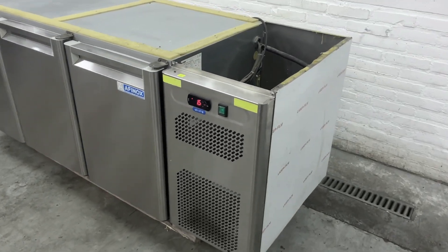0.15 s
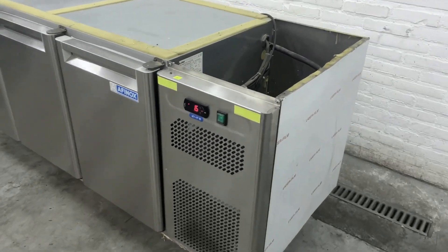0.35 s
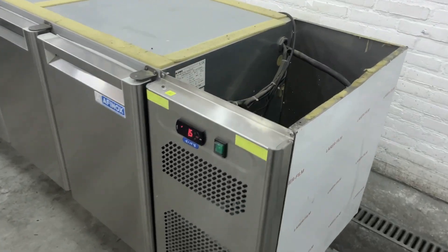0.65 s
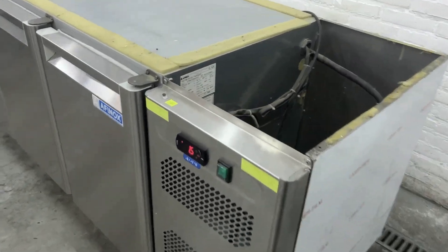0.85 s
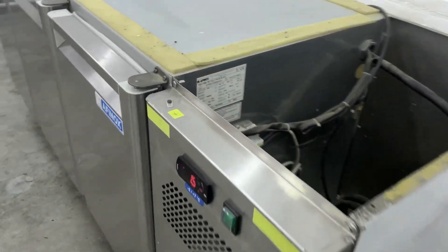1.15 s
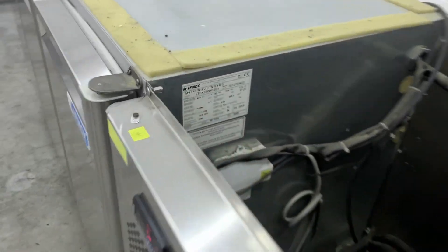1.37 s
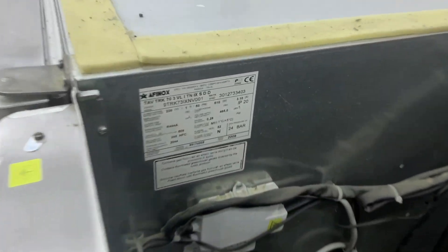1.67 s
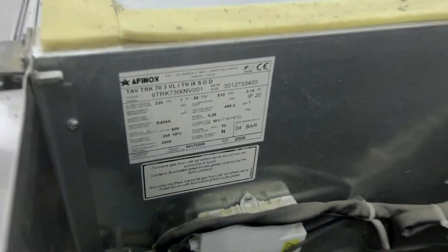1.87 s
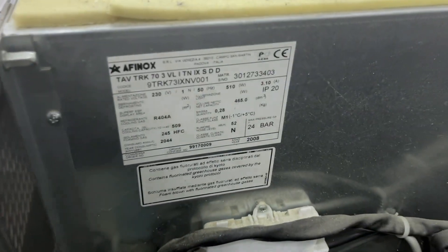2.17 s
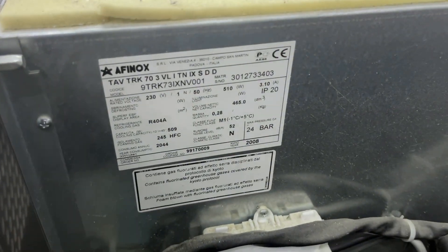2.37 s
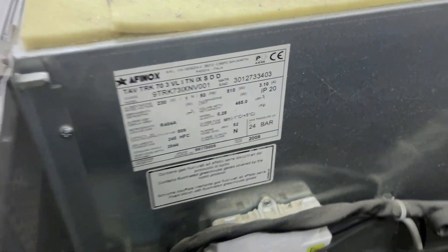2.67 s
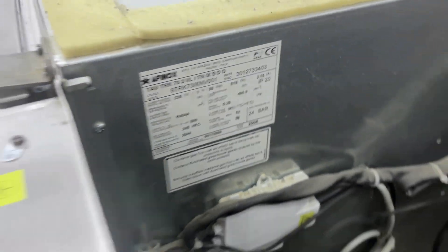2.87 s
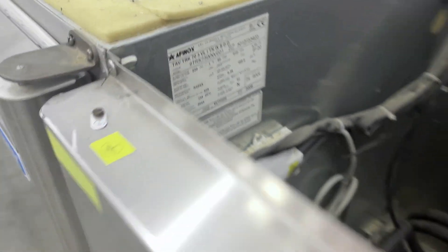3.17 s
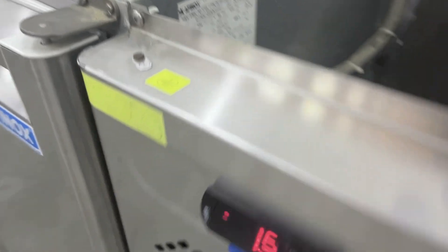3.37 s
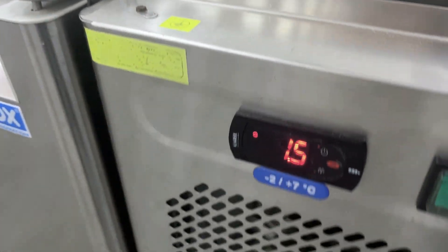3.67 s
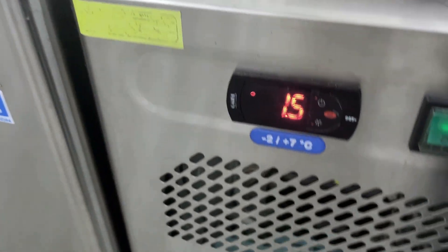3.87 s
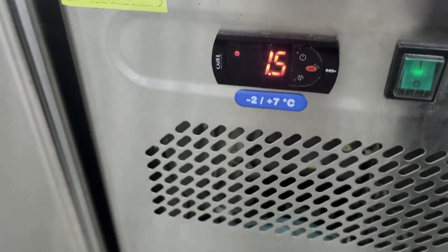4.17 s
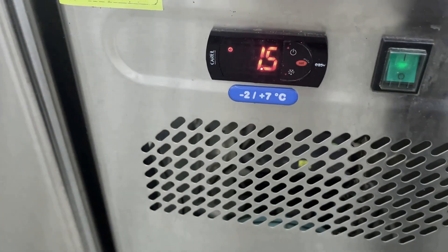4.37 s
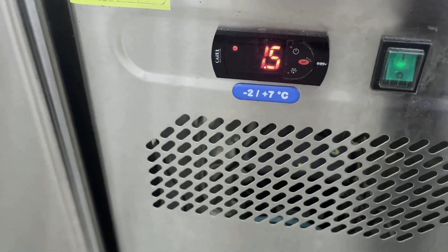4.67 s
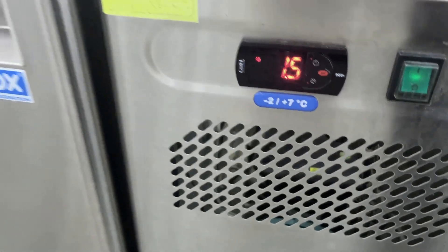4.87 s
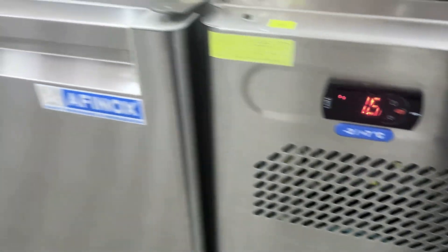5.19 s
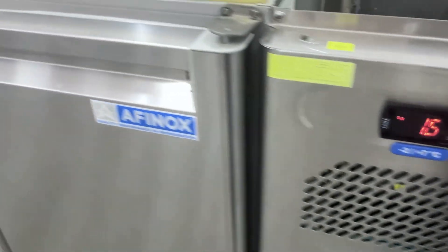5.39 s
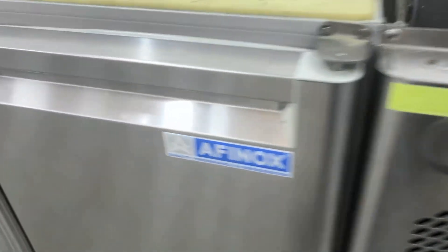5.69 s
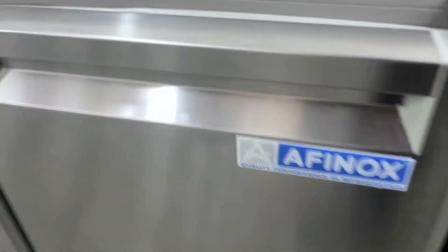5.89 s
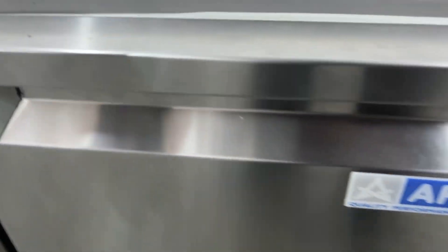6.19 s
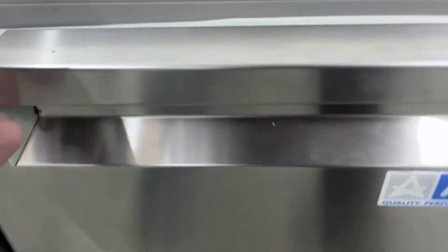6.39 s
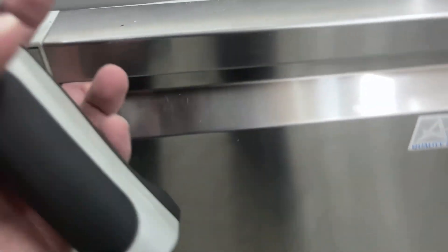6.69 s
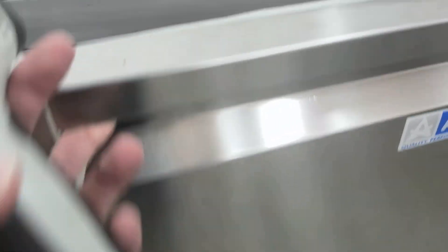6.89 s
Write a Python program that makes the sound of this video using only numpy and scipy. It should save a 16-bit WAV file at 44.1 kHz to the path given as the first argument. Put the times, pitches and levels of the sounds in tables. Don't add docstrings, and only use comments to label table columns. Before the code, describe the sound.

A refrigerated steel counter hums and blows air, swelling as the microphone nears its machinery, then a door seal creaks and snaps open.

```python
import sys
import numpy as np
from scipy import signal
from scipy.fft import rfft, irfft, next_fast_len
from scipy.io import wavfile
from scipy.ndimage import uniform_filter1d

SR = 44100
rng = np.random.default_rng(int(sys.argv[2]) if len(sys.argv) > 2 else 0)


def volts(x):
    e = np.asarray(x, float) / 20
    return 10 ** e


def generate_wav(sig):
    pcm = np.round(np.clip(np.atleast_2d(sig).T, -1, 1) * 32767).astype(np.int16)
    wavfile.write(sys.argv[1], SR, pcm)


N = 310464
TIME = np.arange(N) / SR
SIZE = next_fast_len(N + SR // 2)
FREQ = np.maximum(np.fft.rfftfreq(SIZE, 1 / SR), 1)


def unit(x):
    return x / np.sqrt(np.mean(x ** 2))


def curves(table):
    s, *columns = np.transpose(table)
    return [np.interp(TIME, s, c) for c in columns]


def on_freq(table, hz):
    f, v = np.transpose(table)
    return np.interp(np.log(hz), np.log(np.maximum(f, 1)), v)


def walk(rate):
    k = int(SR / rate)
    held = np.repeat(rng.standard_normal(N // k + 1), k)
    return 1.37 * uniform_filter1d(uniform_filter1d(held, k), k)[:N]


def band(x, hz, width):
    return irfft(rfft(x, SIZE) / (1 + ((FREQ - hz ** 2 / FREQ) / width) ** 4), SIZE)[:N]


def ring(x, hz, t60):
    r, w = 1000 ** (-1 / (t60 * SR)), 2 * np.pi * hz / SR
    return signal.lfilter([0, np.sin(w)], [1, -2 * r * np.cos(w), r * r], x)


def taps(times, db):
    x = np.zeros(N)
    np.add.at(x, np.minimum(np.round(np.asarray(times) * SR).astype(int), N - 1), volts(db))
    return x


def bells(table, t):
    return [(db, np.exp(-.5 * ((t - s) / length) ** 2)) for s, length, db in table]


def spots(table):
    t = TIME[::100]
    return np.interp(TIME, t, sum(db * bell for db, bell in bells(table, t)))


# time in seconds, gain from nearness to the machine bay in dB, to the grille in dB.
PHONE_PATH = [(0, -3, -6.5), (.3, -2.5, -6.5), (.9, -1, -4.5), (1.4, 1, -3.5), (1.62, 4, -3), (1.82, 6, -1),
              (2.37, 7, 1), (2.9, 6, -1), (3.2, 3, 0.5), (3.55, 1, 1), (4.3, 0.96, 1), (5.1, 0.85, 1),
              (5.5, -.5, -1), (6.4, -1.5, -2.5), (7.04, 1, -1)]


def heard(follows):
    bay, grille = curves(PHONE_PATH)
    return np.array([db + to_bay * bay + to_grille * grille for db, to_bay, to_grille in follows])


# pitch in Hz, level in dB, which of the three levels below it follows.
HUM_TONES = [(99.9, -0.5, 0), (146.6, 0.5, 1), (50.4, -26, 1), (294.7, -21, 1), (345.3, -22, 1),
             (391, -21.5, 1), (455.5, -26, 1), (196.4, 2, 2), (217.8, -9, 2), (248.4, -20, 2),
             (299.6, -18, 2), (490.6, -17.5, 2), (575, -18.5, 2)]
# usual level in dB, share of bay gain, share of grille gain.
HUM_FOLLOWS = [
    (-42, 0.95, 0.49),
    (-39.5, 1.36, 0.09),
    (-42.5, 0.75, 0.13),
]
# time in seconds, length in
# seconds, change in dB.
MAINS_SPOTS = [(.15, 0.035, -7), (.52, 0.056, -14), (1.17, 0.082, -9), (6.1, 0.34, 2.5), (6.57, 0.029, -14),
               (6.92, 0.11, 10.5)]
PUMP_SPOTS = [(.98, 0.074, -18), (1.35, 0.18, 4), (2.04, 0.073, -8.5), (2.72, 0.13, 3.5), (3.2, 0.037, -18),
              (4.73, .05, -11), (5.14, 0.14, -7.5), (5.6, 0.1, 3.5), (6.23, 0.045, -24), (6.8, 0.44, -0.5)]
PAIR_SPOTS = [(.35, 0.077, -2), (1.3, .15, -3.5), (3.2, 0.053, -5.5), (5.95, 0.39, 4), (6.68, 0.029, 1)]


def motors():
    beat_s, beat_dip_s, beat_share = 0.704, 4.423, 0.31
    level = heard(HUM_FOLLOWS) + [spots(MAINS_SPOTS), spots(PUMP_SPOTS), spots(PAIR_SPOTS)]
    level[0] += 20 * np.log10(abs(1 - beat_share * np.exp(2j * np.pi * (TIME - beat_dip_s) / beat_s)))
    hum = np.zeros(N)
    for hz, db, k in HUM_TONES:
        loudness = np.sqrt(2) * volts(level[k] + db + 0.5 * walk(5.5))
        turns = hz * TIME + rng.random() + 0.018 * walk(3.33)
        hum += loudness * np.sin(2 * np.pi * turns)
    return hum


AIR_MARKS_HZ = [150, 460, 670, 820, 2300, 5000]
AIR_MARK_ROW = [0, 1, 1, 2, 2, 3]
# pitch in Hz, level in dB.
AIR_COLOUR = [(25, -44), (50, 4), (70, -5), (120, -9.5), (180, 0), (240, -5), (290, -14), (400, -10),
              (500, -7.5), (640, -6.5), (730, -15),
              (1000, -15.5), (1400, -18.5), (2700, -27), (3600, -28.5), (4800, -33), (7000, -40),
            (8400, -44.5), (10500, -48.5), (13000, -46.5), (15500, -55)]
# usual level in dB, share of bay gain, share of grille gain.
AIR_FOLLOWS = [
    (-3, 1.4, .01),
    (-0.5, .01, 1.14),
    (-0.4, 1.01, .01),
    (-3, 1.14, .01),
]


def fan_air():
    air_db, gust_db = -38, 1.5
    hz, s, noise = signal.stft(rng.standard_normal((3, N)), SR, nperseg=2048, noverlap=1536)
    frames = np.minimum((s * SR).astype(int), N - 1)
    place = heard(AIR_FOLLOWS)[:, frames]
    place[0] += gust_db * walk(7)[frames]
    hz = np.maximum(hz, 1)
    octave, steps = np.log2(hz), np.arange(9, 29) / 2
    flicker = np.array([walk(12)[frames] for step in steps])

    def between(marks):
        return np.array([np.interp(octave, marks, row) for row in np.eye(len(marks))]).T

    db = between(np.log2(AIR_MARKS_HZ)) @ place[AIR_MARK_ROW]
    db = db + 0.59 * between(steps) @ flicker + .5 * walk(3.18)[frames]
    colour = volts(on_freq(AIR_COLOUR, hz))
    gain = volts(air_db + db) * unit(colour)[:, None]
    return signal.istft(noise * gain, SR, nperseg=2048, noverlap=1536)[1][:, :N]


MAINS_HZ, BLADE_HZ, TURN_HZ = 99.9, 118.2, 19.7
ALL_MEET_S = 2.1894


def knocks(rate_hz, other_hz, db):
    beat = np.arange(np.ceil(-ALL_MEET_S * rate_hz), (N / SR - ALL_MEET_S) * rate_hz) / rate_hz
    return beat + ALL_MEET_S, db + 1.1 * np.cos(2 * np.pi * other_hz * beat), TURN_HZ * beat


# pitch in Hz, time to fade by 60 dB in seconds, level in dB,
# which part (0 guard, 1 bracket, 2 cover, 3 clip).
LOOSE_PARTS = [(3240, .04, -1, 0), (3140, .025, -11, 0), (2480, .02, -11, 1), (3500, .015, -4, 3),
               (3760, .02, 0, 3), (3900, .018, -1, 1), (4060, .012, -1, 1), (4340, .012, -2, 1),
               (5450, .011, -1, 2), (5000, .008, -10, 2), (6350, .015, -9, 2), (7000, .006, -7, 2),
               (11400, .01, -20, 2), (13400, .02, -18, 2)]
# usual level in dB, share of bay gain, share of grille gain.
PART_FOLLOWS = [
    (-64, 1.0, .01),
    (-64.5, .6, .5),
    (-77.5, 1.6, .01),
    (-64, 1.3, .01),
]
# how much a fan turn swings its knocks in dB, and where in the turn it is struck in turns.
TURN_SWING_DB = [6.5, 3.0, 10.0, 3.5]
TURN_LAG = [.22, .26, .02, .26]
# time in seconds, length in seconds, change in dB.
GUARD_SPOTS = [(.4, 0.27, 8), (1.08, 0.12, 11.5), (1.33, .06, -3), (1.72, 0.16, 11), (2.1, .06, -5),
               (2.45, 0.082, 4), (3.05, 0.17, 2), (3.5, 0.074, -12), (4.15, .06, -8), (4.8, .12, -6),
               (5.1, 0.09, 9.5), (5.45, 0.087, -6), (6.1, 0.31, 1)]
BRACKET_SPOTS = [(.45, 0.17, 6.5), (.88, .06, 1), (2.5, .15, 3.5), (2.8, .07, -4), (3.0, 0.067, 3.5),
                 (3.95, 0.068, 3.5), (4.45, 0.24, 5.5), (5.1, 0.089, 5.5), (5.9, .4, -0.5)]
COVER_SPOTS = [(1.0, .08, 7), (1.3, 0.09, -5), (2.2, 0.21, 9.5), (2.63, 0.047, 12), (2.78, .05, -1),
               (3.45, .04, 9), (4.2, .2, 6)]
CLIP_SPOTS = [(1.7, 0.13, 5.4), (2.05, 0.071, 3), (2.5, .16, 5.5), (3.1, .1, 3), (3.7, 0.091, 5.3),
              (6.05, 0.092, 4)]


def rattle():
    both_forces = [knocks(MAINS_HZ, BLADE_HZ, 0), knocks(BLADE_HZ, MAINS_HZ, -5.5)]
    times, knock_db, turn = np.hstack(both_forces)
    chance = rng.standard_normal((len(times), 1 + 2 * len(LOOSE_PARTS))).T
    facing = [spots(GUARD_SPOTS), spots(BRACKET_SPOTS), spots(COVER_SPOTS), spots(CLIP_SPOTS)]
    level = heard(PART_FOLLOWS) + facing
    out = np.zeros(N)
    for (hz, t60, db, k), late, own in zip(LOOSE_PARTS, chance[1::2], chance[2::2]):
        swing = TURN_SWING_DB[k] * np.cos(2 * np.pi * (turn - TURN_LAG[k]))
        push = taps(times + .0003 * abs(late), knock_db + swing + .7 * chance[0] + 1.2 * own)
        out += volts(level[k] + db) * unit(ring(push, hz, t60))
    return out


# pitch in Hz, width in Hz, level in dB.
GAS_WHISTLES = [(5750, 90, -81), (6350, 110, -81), (8280, 70, -80), (8550, 140, -84), (11400, 200, -88),
                (12600, 60, -81), (15400, 120, -86)]


def whistles():
    hiss = rng.standard_normal(N)
    near = volts(1.5 * heard(AIR_FOLLOWS)[3])
    tones = np.zeros(N)
    for hz, width, db in GAS_WHISTLES:
        t60 = np.log(1000) / (np.pi * width)
        tones += volts(db + 3.7 * walk(2.52)) * unit(ring(hiss, hz, t60))
    return near * tones


# time in seconds, length in seconds, level in dB.
SLEEVE_RUSTLES = [(3.03, 0.073, -64), (3.6, 0.071, -64), (3.83, .03, -67), (5.33, 0.028, -62),
                  (5.7, .02, -65), (6.224, .03, -68), (6.77, 0.047, -51)]


def sleeve():
    shape = sum(volts(db) * bell for db, bell in bells(SLEEVE_RUSTLES, TIME))
    return shape * unit(band(rng.standard_normal(N), 7900, 11000))


# time in seconds, slide level in dB, drum level in dB.
HAND_MOVES = [(6.4, -80, -80), (6.5, -56, -63), (6.55, -48, -62), (6.61, -50, -58), (6.66, -56, -60),
              (6.72, -70, -54), (6.78, -80, -64), (6.85, -92, -80)]


def hand():
    slide_db, drum_db = curves(HAND_MOVES)
    skin = rng.standard_normal(N)
    slide = unit(band(skin, 3860, 1200) + volts(-16.5) * band(skin, 5700, 8000))
    drum = unit(band(skin, 290, 70))
    return (volts(slide_db) * slide + volts(drum_db) * drum) * (TIME > HAND_MOVES[0][0])


# time in seconds, rubbing level in dB.
SEAL_RUB = [(6.69, -72), (6.743, -52), (6.749, -40.5), (6.795, -41.5), (6.81, -37.5), (6.865, -37),
            (6.885, -30), (6.9, -38), (6.93, -43.5)]
# pitch in Hz, width in Hz, level in dB.
RUB_MODES = [(3150, 580, 3), (3800, 550, -1), (4380, 520, -6), (4720, 280, -8.5)]
# time in seconds, door ring in dB, crack in dB, thump in dB.
SEAL_SNAPS = [(6.6449, -70, -37.5, -70), (6.6798, -53.5, -42, -68.5), (6.716, -53, -62, -25),
              (6.8704, -18, -27, -50), (6.8763, -19.5, -35, -50), (6.8789, -23, -26, -54),
              (6.8837, -13.5, -28, -34), (6.8889, -15, -32, -32), (6.9085, -39, -37, -50),
              (6.9105, -13, -6.5, -34), (6.91, -37, -12.5, -60), (6.9128, -10.5, -35, -45),
              (6.9142, -13, -25, -38), (6.918, -25, -34, -47), (6.919, -32, -37, -48),
              (6.927, -44, -38, -48), (6.9315, -30, -40, -36), (6.96, -27, -46, -28)]
# pitch in Hz, time to fade by 60 dB in seconds,
# level in dB at the first crack, level in dB at the second crack.
DOOR_SKIN = [(740, .018, -20, -8), (1040, .013, -12, 0), (1290, .015, 5, -2), (1530, .013, 2, 6),
             (1800, .009, -9, -5), (2200, .005, -11, -1), (2680, .006, -20, -9), (3200, .005, -20, -12),
             (4290, .005, -24, -17)]
# pitch in Hz, time to fade by 60 dB in seconds, level in dB.
DOOR_PANEL = [(91.5, 0.45, -12), (324, 0.19, -4), (525, .12, -22)]


def door():
    lets_go_s, second_crack_s, open_s = 6.868, 6.9, 6.915
    rub_db = curves(SEAL_RUB)[0] - 40 * np.maximum(TIME - SEAL_RUB[-1][0], 0)
    low_db, high_db = -9, np.where(TIME > lets_go_s, -3, -15)
    grit = rng.standard_normal(N) * volts(2.2 * walk(250))
    rub = unit(sum(volts(db) * band(grit, hz, width) for hz, width, db in RUB_MODES))
    rub += volts(low_db) * unit(band(grit, 1560, 2200))
    rub += volts(high_db) * unit(band(grit, 6800, 5100))
    rub *= volts(rub_db) * (TIME > SEAL_RUB[0][0])

    s, ring_db, crack_db, thump_db = np.transpose(SEAL_SNAPS)
    late = 0.00073 * rng.random((len(s), len(DOOR_SKIN))).T
    skin = np.zeros(N)
    for (hz, t60, first, second), lag in zip(DOOR_SKIN, late):
        push = taps(s + lag, ring_db + np.where(s < second_crack_s, first, second))
        skin += ring(ring(push, hz, t60), hz, 0.0047) * hz / SR
    thump = uniform_filter1d(taps(s + 0.00084, thump_db), 80)
    panel = sum(volts(db) * ring(thump, hz, t60) for hz, t60, db in DOOR_PANEL)

    hiss = rng.standard_normal(N)
    bright = unit(band(hiss, 12300, 2300) + volts(-4) * band(hiss, 7000, 10000))
    crack_fade_s = 0.00045
    crack = bright * signal.lfilter([1], [1, -np.exp(-1 / (crack_fade_s * SR))], taps(s, crack_db))
    draught = volts(-38 - 8 * (TIME - open_s)) * (TIME > open_s) * unit(band(hiss, 1800, 2900))
    return draught + rub + volts(3.5) * skin + panel + crack


# pitch in Hz, lead in radians.
PORT_LEAD = [(0, 0), (950, 0), (1550, -2.1), (1800, 0), (2900, 1.1), (4800, .8), (5600, -1.1), (6900, -1.4),
             (7700, -3.1), (8900, -3.2), (9900, -4.5), (11000, -6.2), (12900, -6.3), (14700, -9.4)]
# pitch in Hz, share from 0 to 1.
DIRECT_SHARE = [(190, 0.98), (300, 0.89), (640, 0.73), (800, 0.62), (1400, 0.25), (2000, 0.79),
                (3500, 0.74), (4500, 0.66), (6500, 0.94), (7700, 0.84), (9000, 0.93), (10000, 0.33),
                (11500, 0.83), (13000, 0.76)]


def scene():
    room_t60_s, door_room_db, left_db = 0.14, -7, 1.3
    top_hz, low_hz = 16000, 35.2
    sound = rfft(motors() + fan_free_parts(), SIZE)
    close = rfft(door(), SIZE)
    air = rfft(fan_air(), SIZE)
    t = TIME[:SR // 2]
    echoes = rng.standard_normal((2, len(t))) * 1000 ** (-t / room_t60_s)
    echoes = rfft(echoes / np.sqrt(np.sum(echoes ** 2, axis=1, keepdims=True)), SIZE)
    share = np.clip(on_freq(DIRECT_SHARE, FREQ), 0, 1)
    f, lead = np.transpose(PORT_LEAD)
    ports = np.exp(.5j * np.outer([1, -1], np.interp(FREQ, f, lead)))
    walls = air[1:] + (volts(-1) * sound + volts(door_room_db) * close) * echoes
    both = np.sqrt(share) * ports * (air[0] + sound) + ports * close + np.sqrt(1 - share) * walls
    out = irfft(both / (1 + (FREQ / top_hz) ** 60 + (low_hz / FREQ) ** 4), SIZE)[:, :N]
    return out * volts(np.array([[.5], [-.5]]) * left_db)


def fan_free_parts():
    return rattle() + whistles() + sleeve() + hand()


def roll_off(x):
    return signal.sosfilt(signal.butter(12, 16380, fs=SR, output="sos"), x)


def record(dry):
    top = .8
    return roll_off(top * np.tanh(dry / top))


dry = scene()
out = record(dry)
generate_wav(out)
```